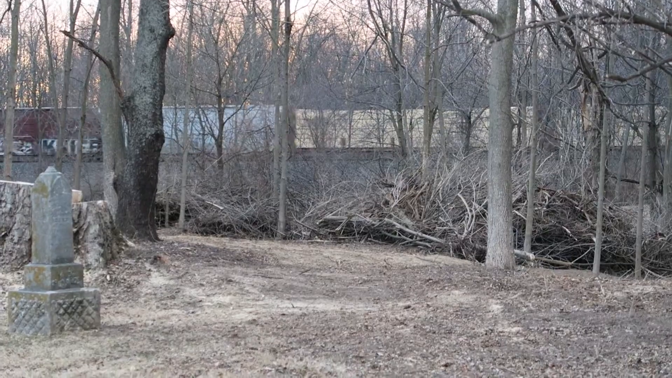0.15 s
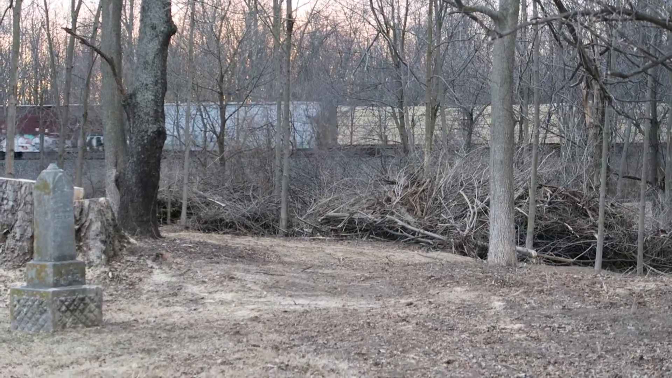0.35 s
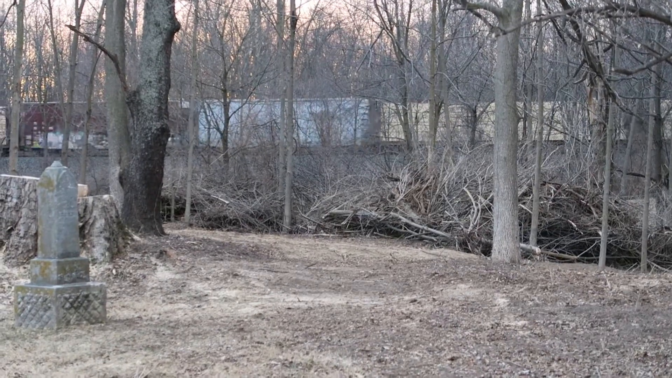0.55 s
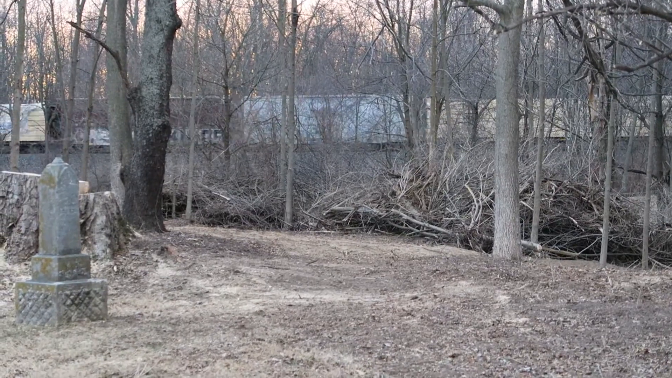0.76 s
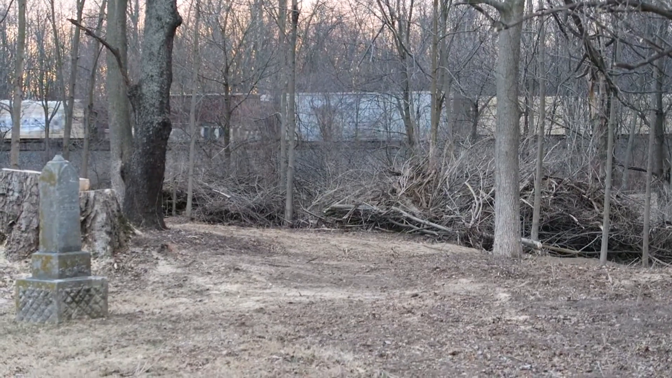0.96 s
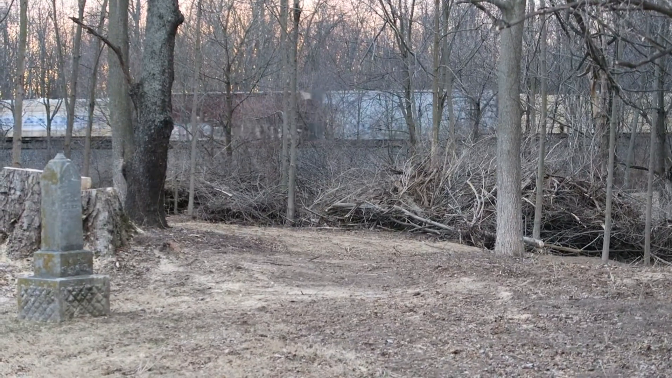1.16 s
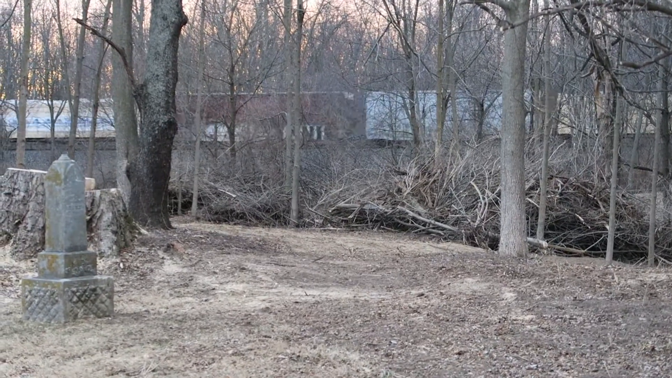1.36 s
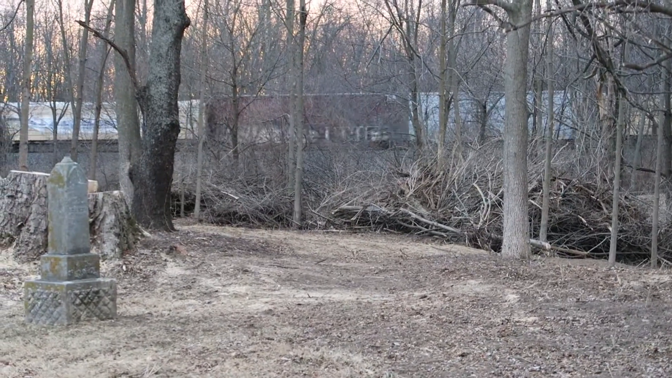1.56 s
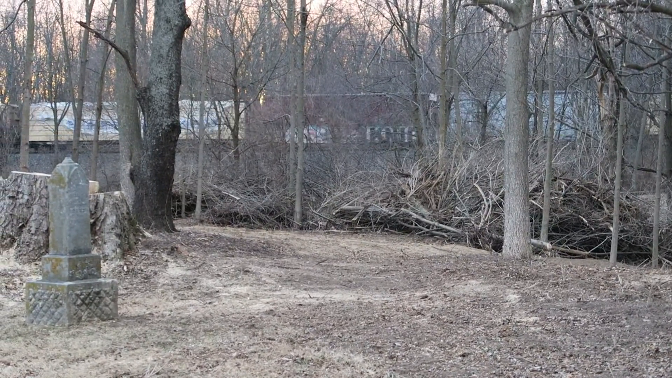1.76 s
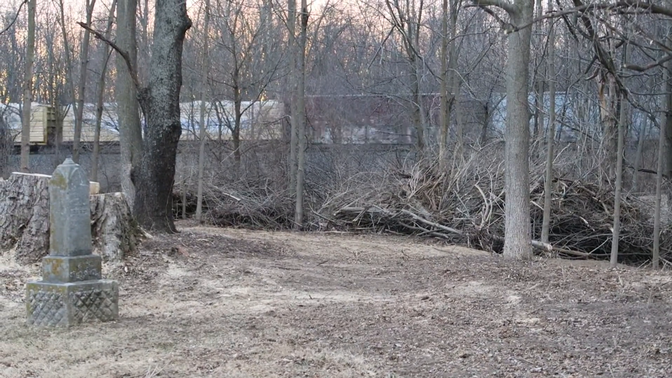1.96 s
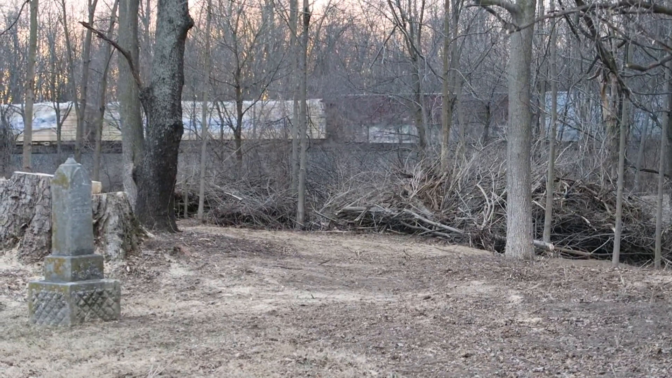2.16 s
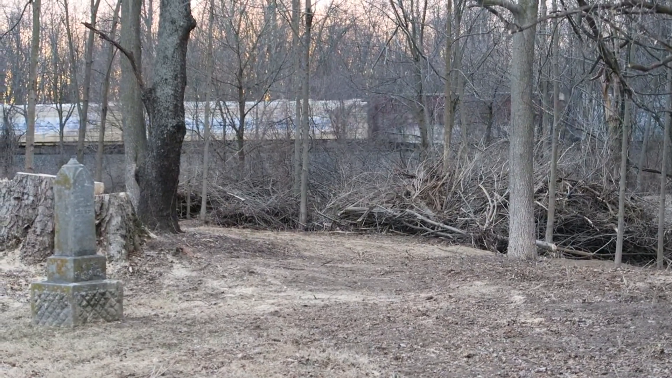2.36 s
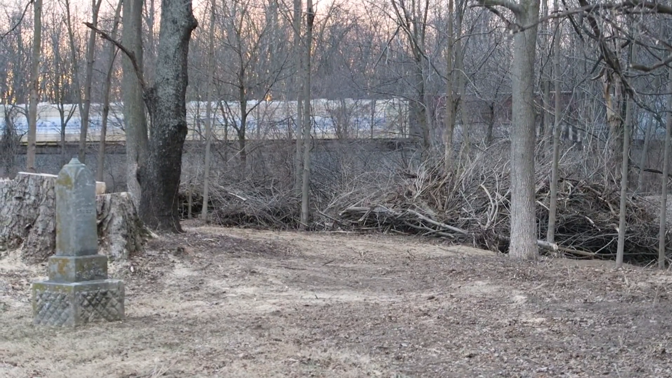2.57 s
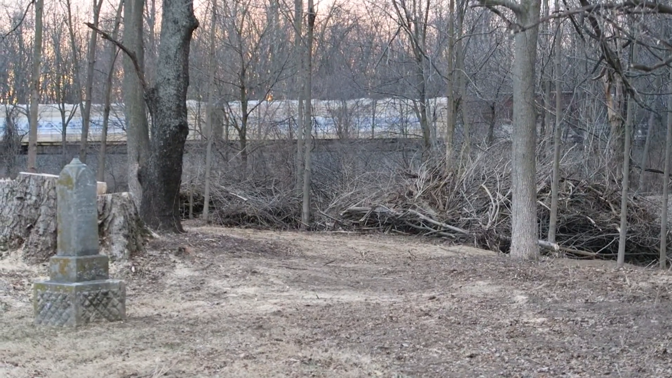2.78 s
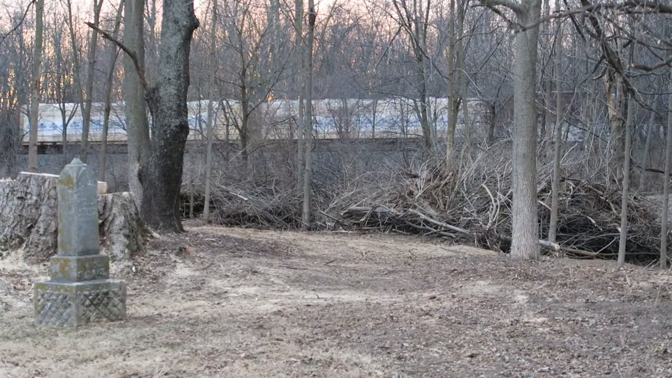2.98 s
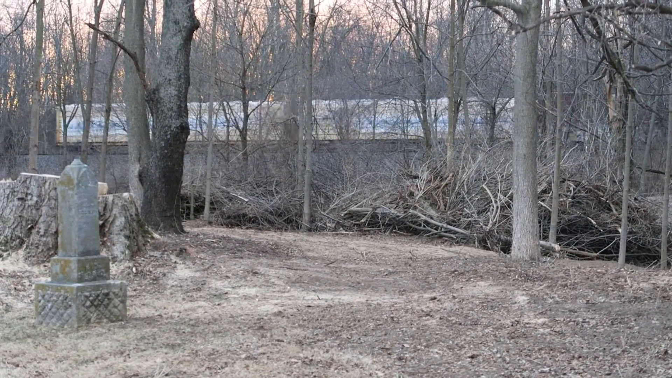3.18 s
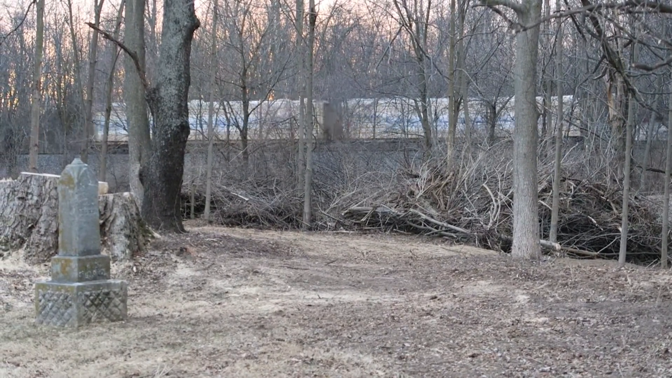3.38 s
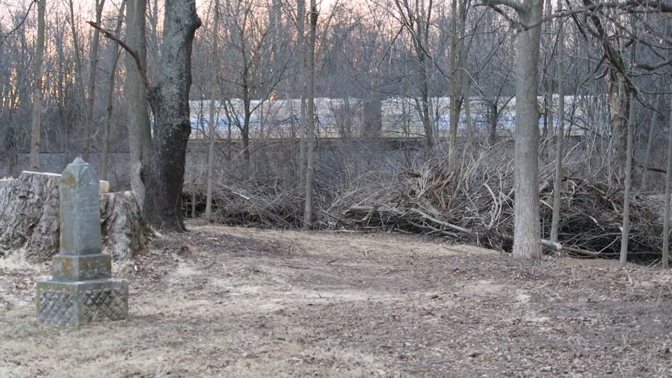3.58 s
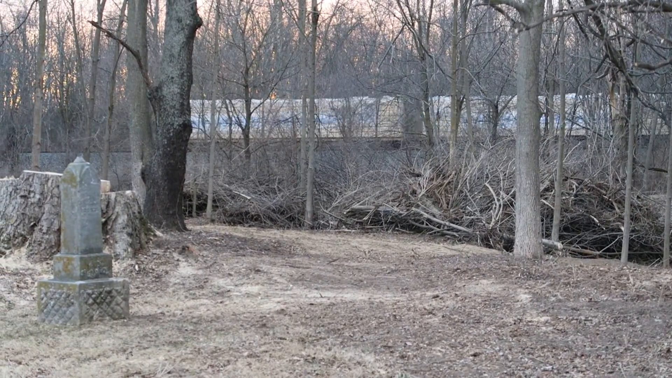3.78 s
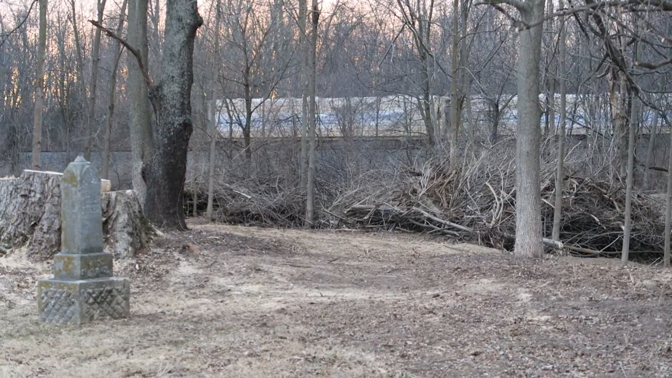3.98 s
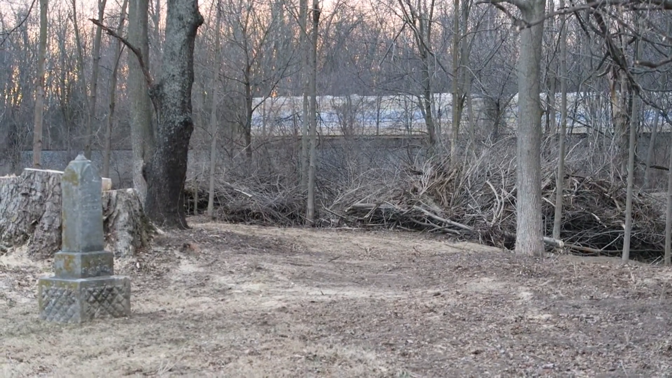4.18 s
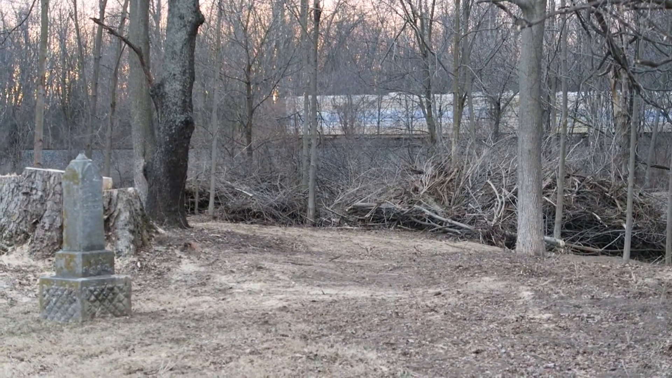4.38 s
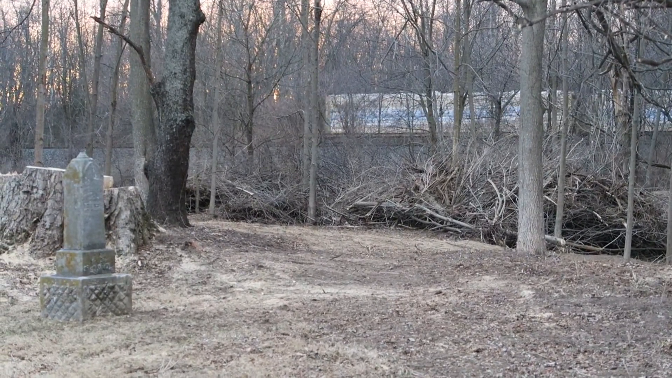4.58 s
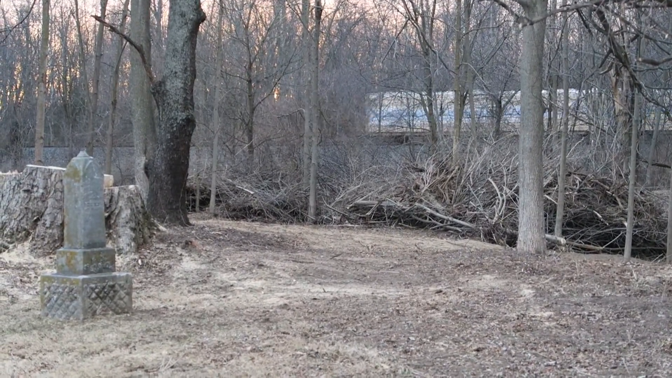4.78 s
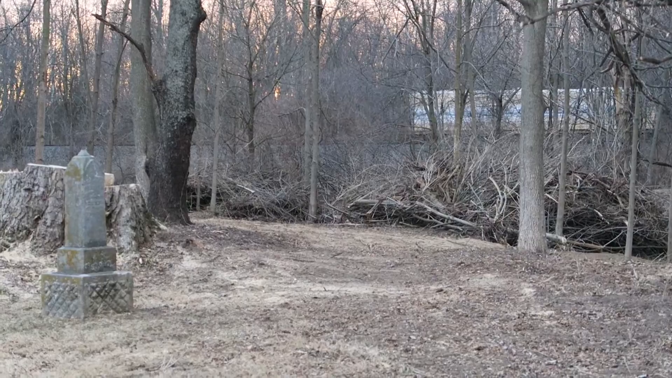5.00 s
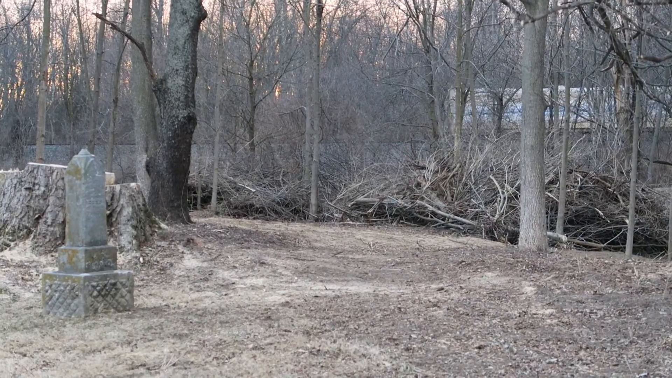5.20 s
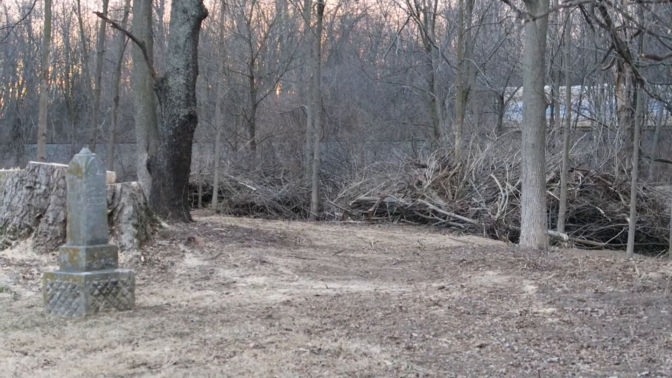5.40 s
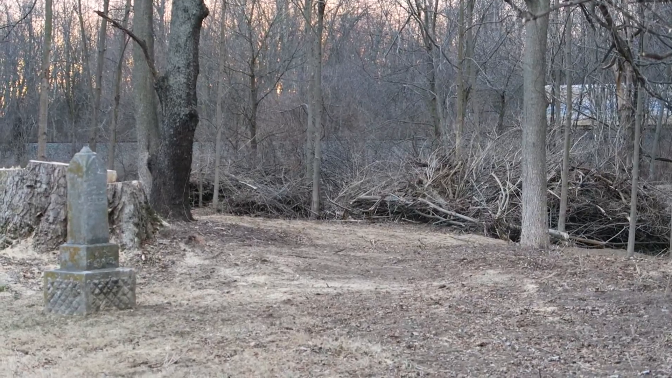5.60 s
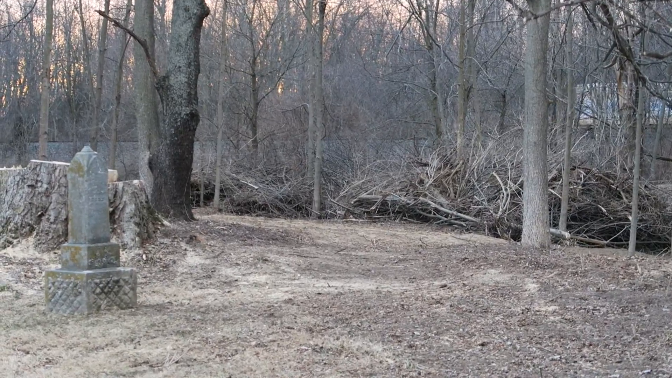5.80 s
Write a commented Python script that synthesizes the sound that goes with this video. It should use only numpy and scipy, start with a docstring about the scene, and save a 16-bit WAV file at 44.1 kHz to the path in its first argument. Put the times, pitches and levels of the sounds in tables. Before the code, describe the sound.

A freight train is already rolling past behind bare trees. A low throbbing diesel drone and heavy ground rumble dominate, with a muffled wheel roar and softer hiss above. Irregular dull thumps, blurred rattles and a few coupler clanks pass by. The roar surges with each wagon, then sinks in the last second. Outdoor, mid-distance microphone, narrow stereo, light woodland echo.

```python
"""Freight train behind bare trees

A long freight train rolls by behind a belt of bare trees and fades as its last wagons pass.
Sine waves make the diesel's throbbing drone, the hums, the thumps and the ringing or singing wheels.
Shaped noise makes the rumble, the roar and hiss of wheels on rails, and the flange scrapes.
Single clicks become rattles, clanks and ticks; the trunks blur the rattle."""
import sys
import numpy as np
from scipy import signal
from scipy.fft import rfft, irfft, next_fast_len
from scipy.io import wavfile
from scipy.ndimage import uniform_filter1d, map_coordinates

SR = 44100
rng = np.random.default_rng(int(sys.argv[2]) if len(sys.argv) > 2 else 0)


def put_to_file(sound):
    """Save the sound as 16-bit audio at rate SR, in the file named by the first command-line argument."""
    columns = np.atleast_2d(sound).T  # one column per channel
    safe = np.clip(columns, -1, 1)
    whole_steps = np.round(safe * 32767)
    wavfile.write(sys.argv[1], SR, whole_steps.astype(np.int16))


N = 257984  # length in samples

# how fast the diesel fires: t/s, f/Hz
FIRING_PITCH = [(0, 73.6), (2.8, 73.42), (5.85, 73.15)]
# loudness of the diesel's drone: t/s, level/dB
DRONE_LEVEL = [(0, -11.5), (.2, -20), (.5, -12.5), (1, -21), (1.9, -15), (2.3, -20), (2.9, -16.5),
               (3.95, -19.5), (4.3, -13.5), (4.66, -23.5), (5.15, -18), (5.6, -29.5), (5.85, -24.5)]
# tones in the drone: multiple of the crankshaft rate, relative level/dB
ENGINE_ORDERS = [(8, 5), (11, -21.5), (16, -18.5)]
# the drone throbs once a crankshaft turn: swing either way and its random unevenness, in dB
THROB_DB, UNEVEN_DB = 3.5, 0.56
# low hums that swell and fade around the drone: t/s, length/s, f/Hz, level/dB before wavering
HUMS = [(1.704, 1.5, 215.1, -38), (1.896, 0.48, 66.55, -25), (2.544, 0.44, 68.3, -22.5),
        (2.795, 0.41, 59.9, -21), (3.247, 1.9, 86, -28), (3.249, 2.4, 99.3, -27.5), (4.35, .4, 62.77, -21),
        (4.599, 1.5, 155.2, -37)]

# tone colour of the shaking wagon bodies and ground: f/Hz, relative level/dB per Hz
RUMBLE_COLOUR = [(12, -48.5), (22, -34), (32, -19), (40, -8.5), (48, -1), (54, -2.5), (61, -6.5),
                 (68, -2.5), (78, -1.5), (90, -1), (105, -2), (140, -8.5), (178, -17), (212, -15.5),
                 (250, -26), (450, -38), (900, -100)]
# heavy and light wagons shake the ground: t/s, level/dB before lurching
SHAKE_LEVEL = [(0, -21.5), (.25, -20.7), (.58, -18.2), (.78, -20.5), (1.15, -18.5), (2.2, -20.5),
               (2.7, -18.8), (3.08, -20), (3.37, -18), (3.8, -19.8), (4.4, -18.9), (5, -21.6),
               (5.85, -24.2)]
LURCH_DB, LURCH_RATE = 1.07, 10  # random lurches of the rumble: depth in dB, knots per second
# wheels thump over dips in the track: t/s, peak level/dB
THUMPS = [(.114, -12), (.554, -12), (.636, -11), (1.402, -13), (1.827, -14), (2.072, -11), (2.518, -15),
          (2.601, -15.5), (2.944, -10.5), (3.396, -13), (3.734, -14), (4.469, -15), (5.052, -14.5)]
# a thump: pitch in Hz, its scatter either way (share), length in s
THUMP_HZ, THUMP_SPREAD, THUMP_S = 76.4, .1, .035

# the wagons surge as each pair of bogies passes:
# t/s, roar level/dB, hiss level/dB (both before small trims and wavering)
WAGON_LEVELS = [(0, -25.5, -35.5), (.16, -25.5, -39), (.46, -23, -35.5), (.59, -24, -34.3),
                (.66, -25, -39.5), (.78, -24, -38.5), (.88, -24.5, -37.5), (1.03, -23.5, -34.5),
                (1.17, -24, -37.5), (1.36, -23, -35), (1.46, -24, -37), (1.83, -23, -35.5),
                (2.05, -24.5, -38), (2.33, -25.7, -35.5), (2.48, -24, -36), (2.68, -23.5, -35),
                (2.86, -21.5, -34), (2.92, -24, -34.5), (2.98, -25, -39), (3.34, -23.5, -35),
                (3.46, -26.5, -38), (3.66, -24.5, -36), (3.8, -25, -39.5), (4.08, -24, -35.5),
                (4.3, -23.5, -37.5), (4.44, -24.5, -36.5), (4.53, -26.5, -38), (4.67, -26, -38),
                (4.84, -24.5, -36), (4.96, -25, -38), (5.08, -27.5, -40.5), (5.4, -28.5, -40.5),
                (5.85, -31, -43.5)]
# wheels on rails heard through the trees: f/Hz, relative level/dB per Hz
ROAR_COLOUR = [(100, -31), (200, -5), (290, -2.5), (480, -2.5), (580, -1), (680, -1), (800, -3.5),
               (920, -6.5), (1100, -8.5), (1300, -16.5), (1800, -21), (3000, -49), (6000, -81)]
# wheel hiss heard through the trees: f/Hz, relative level/dB per Hz
HISS_COLOUR = [(600, -29.5), (1300, 0), (1600, 4.5), (2150, -1.5), (2600, -2), (3050, -9), (3700, -13),
               (4400, -18), (5200, -25), (6300, -31.5), (8000, -40), (10500, -45.5), (12000, -51),
               (14000, -72)]
# wheel resonances: f/Hz, width setting/Hz, relative level/dB
WHEEL_MODES = [(1625, 130, -9), (1869, 120, 2), (2434, 186, -0.5), (2622, 40, -3.5), (3294, 120, -6.5),
               (4020, 170, -15.5)]
# wheels differ: resonance shift either way (share), random changes in knots per second
WHEEL_SPREAD, WHEEL_RATE = .015, 5
# resonances of loose running gear: f/Hz, width setting/Hz, relative level/dB
GEAR_MODES = [(200, 25, -4.5), (433, 71, -4.5), (602, 125, 3), (1050, 240, -5.5), (1820, 480, -17),
              (2580, 340, -15.5)]
# couplers clank: t/s, strike strength/dB before the gear shapes it
CLANKS = [(.532, 17), (2.215, 14), (2.925, 16), (4.233, 16), (5.135, 13), (5.767, 10)]

# single wheels ring out of the roar: t/s, length/s, f/Hz, level/dB
RINGS = [(0.53, 0.056, 688, -29.5), (1.06, 0.082, 702, -29.5), (1.366, 0.06, 660, -28),
         (1.865, 0.06, 661, -31), (2.54, 0.037, 2470, -41), (2.58, 0.08, 2610, -42.5),
         (2.77, 0.06, 2640, -40.5), (2.705, .02, 1880, -34), (2.902, 0.08, 726, -29.5)]
FLUTTER_DB = 4  # random swing of a ringing wheel as it catches and lets go, in dB
WANDER_HZ, WANDER_RATE = 20.5, 84  # its pitch wanders: depth in Hz, knots per second

# flange scrapes: t/s, length/s, level/dB before the grit
SCRAPES = [(.63, .1, -55), (.79, .14, -57), (2.855, .15, -45.3), (2.92, .07, -50.5), (4.33, .18, -54),
           (5.69, .07, -52), (5.8, .1, -53)]
# tone colour of a scrape: f/Hz, relative level/dB per Hz
SCRAPE_COLOUR = [(1200, -22), (2600, 4.5), (4200, -3.5), (6000, -16.5), (9500, -37), (13000, -58.5)]
# a singing flange peaks and lingers faintly: t/s, length/s, level/dB
SQUEAL = [(.395, .06, -70), (.43, .3, -83)]
# small dry ticks: t/s, strength/dB before colouring
TICKS = [(.62, -24), (1.374, -23), (2.84, -22), (4.6155, -10.5), (4.619, -18)]
# tone colour of a tick: f/Hz, gain/dB
TICK_COLOUR = [(300, 0), (1200, 6), (2600, 2), (4100, 1), (5200, -11), (6400, -15), (7500, -34),
               (12000, -54)]

# stereo width of the noises and the rattle: f/Hz, side minus mid level/dB
STEREO_WIDTH = [(60, -27.5), (87, -32.5), (130, -22.5), (180, -22), (260, -18), (380, -10.5), (560, -14.5),
                (810, -13.5), (1170, -14), (1690, -12.5), (2460, -19), (3560, -10)]
# how long the wood echoes: f/Hz, time to fall by 60 dB/s
TREE_DECAY = [(100, 0.34), (700, 0.93), (3000, 0.57), (10000, 0.12)]
# air and brush swallow treble from the wheel modes and loose gear: f/Hz, gain/dB
AIR_LOSS = [(2500, -0.5), (4500, -4.5), (7000, -25), (12000, -58.5)]
TOP_HZ = 13500  # nothing is kept from this pitch up


def amp(db):
    """Turn decibels into a multiplying gain."""
    return 10 ** (np.asarray(db) / 20)


def unit(x):
    """Scale a sound to an rms (average strength) of 1."""
    return x / np.sqrt(np.mean(x ** 2) + 1e-20)


def along(points, hz):
    """Join (f/Hz, value) points with straight lines on a log pitch axis."""
    f, value = np.transpose(points)
    return np.interp(np.log(hz + 1), np.log(f + 1), value)


def curves(rows):
    """Give one value per sample for each column after the time."""
    s, *columns = np.transpose(rows)
    return [np.interp(np.arange(N) / SR, s, column) for column in columns]


def wobble(rate):
    """Draw a smooth random curve through rate random knots a second."""
    knots = rng.standard_normal(int(N * rate / SR) + 4)
    return map_coordinates(knots, [np.arange(N) * rate / SR])


def swell(s, length):
    """Make a bell-shaped rise and fall around time s."""
    return np.exp(-(2 * (np.arange(N) / SR - s) / length) ** 2)


def blows(rows):
    """Place a one-sample click for each (t/s, strength/dB) row."""
    s, db = np.transpose(rows)
    return np.bincount(np.round(s * SR).astype(int), amp(db), N)[:N]


def filtered(x, response):
    """Multiply the spectrum of x by a response, with spare room at the end for its tail."""
    m = next_fast_len(N + SR // 2)
    spectrum = rfft(x, m) * response(np.fft.rfftfreq(m, 1 / SR))
    return irfft(spectrum, m)[..., :N]


def colour(points):
    """Turn a (f/Hz, dB) table into a filter response."""
    return lambda hz: amp(along(points, hz))


def body(modes):
    """Resonate like distant metal: each mode applies twice for steep sides, then air dulls it."""
    def response(hz):
        total = 0
        for centre, width, db in modes:
            damping = 1j * hz * 2 * width
            peak = damping / (centre * centre - hz * hz + damping)
            total = total + amp(db) * peak ** 2
        return total * colour(AIR_LOSS)(hz)
    return response


def patchy(depth_db):
    """Make two noises whose strength drifts in shared patches of pitch and time."""
    z = signal.stft(rng.standard_normal((2, N)), nperseg=1024)[2]
    field = rng.standard_normal(z.shape[1:])
    field = uniform_filter1d(field, size=6, axis=0)  # smooth over pitch
    field = uniform_filter1d(field, size=9, axis=1)  # smooth over time
    return signal.istft(z * amp(depth_db * unit(field)), nperseg=1024)[1][:, :N]


def spread(pair, response):
    """Colour two signals as mid and side and blend them into a narrow stereo image of rms 1."""
    def mid_side(hz):
        return response(hz) * np.array([np.ones_like(hz), amp(along(STEREO_WIDTH, hz))])
    mid, side = filtered(pair, mid_side)
    return unit(np.array([mid + side, mid - side]))


def trees(x, wet_db):
    """Add scatter from the trunks, a fading noise tail, and return mid and side."""
    hz, t, z = signal.stft(rng.standard_normal((2, SR // 2)), SR, nperseg=256)
    fade = amp(-60 * t / along(TREE_DECAY, hz)[:, None])
    tail = signal.istft(z * fade, SR, nperseg=256)[1]
    tail = tail / np.linalg.norm(tail[0])
    mid, side = signal.fftconvolve(x[None], tail, axes=1)[:, :N]
    return np.array([unit(x + amp(wet_db) * mid), unit(side)])


def diesel(count=8):
    """Count firings a turn make the drone, two weaker higher orders colour it, and it throbs every turn."""
    (pitch,), (db,) = curves(FIRING_PITCH), curves(DRONE_LEVEL)
    turns = np.cumsum(pitch / count) / SR  # crankshaft turns so far
    orders = 0
    for order, level in ENGINE_ORDERS:
        strength = amp(level + 0.33 * wobble(0.86))
        orders = orders + strength * np.sin(2 * np.pi * (round(order) * turns + rng.random()))
    throb = amp(THROB_DB * np.cos(2 * np.pi * turns) + UNEVEN_DB * wobble(16))
    return amp(db) * unit(throb * orders)


def rumble():
    """Uneven track shakes the wagon bodies and the ground: low noise with random lurches."""
    db, = curves(SHAKE_LEVEL)
    noise = spread(rng.standard_normal((2, N)), colour(RUMBLE_COLOUR))
    return amp(db + LURCH_DB * wobble(LURCH_RATE)) * noise


def wheel_ring(shift):
    """Rough treads excite wheel resonances; a positive shift lowers them, as for larger wheels."""
    return spread(patchy(depth_db=1.5), lambda hz: body(WHEEL_MODES)(hz * (1 + shift)))


def rolling(roar_db, hiss_db):
    """Rough treads drive the rails broadly and make large and small wheels ring by turns."""
    roar = amp(roar_db - 0.16 + 0.33 * wobble(13)) * spread(patchy(depth_db=1.4), colour(ROAR_COLOUR))
    hiss = amp(hiss_db - 1.5) * spread(patchy(depth_db=1), colour(HISS_COLOUR))
    large, small = wheel_ring(WHEEL_SPREAD), wheel_ring(-WHEEL_SPREAD)
    turn = wobble(WHEEL_RATE)
    mix = np.cos(turn + np.pi / 4) * large + np.sin(turn + np.pi / 4) * small
    ring = amp(hiss_db - 5.0) * mix
    flicker = amp(0.7 * wobble(90))  # the treble flickers
    return roar + (hiss + ring) * flicker


def rattle(db, count=220):
    """Couplers and bogies knock at random, blurred by the trees."""
    when, size = rng.random((count, 2)).T
    knocks = np.bincount((when * N).astype(int), size ** 2, N)  # squaring makes most knocks small
    return amp(db - 8.5) * spread(trees(knocks, wet_db=8.5), body(GEAR_MODES))


def thumps():
    """A wheel drops into a dip in the track and its wagon booms for a few cycles."""
    t = np.arange(N) / SR
    total = 0
    for (s, db), (detune, phase) in zip(THUMPS, rng.random((len(THUMPS), 2))):
        hz = THUMP_HZ * (1 + THUMP_SPREAD * (2 * detune - 1))
        boom = np.sin(2 * np.pi * (hz * t + phase))
        total = total + amp(db) * swell(s, THUMP_S) * boom
    return total


def flanges(squeal_hz=7754):
    """Flanges rub the rail: gritty scrapes of noise, and one thin wavering note."""
    rub = sum(amp(db) * swell(s, length) for s, length, db in SCRAPES)
    grit = amp(1.2 * wobble(90))
    scrape = rub * grit * spread(rng.standard_normal((2, N)), colour(SCRAPE_COLOUR))
    pitch = squeal_hz + 22 * wobble(130)
    note = unit(np.sin(2 * np.pi * np.cumsum(pitch) / SR))
    singing = sum(amp(db) * swell(s, length) for s, length, db in SQUEAL)
    return scrape + singing * note


def ringing_wheels():
    """Now and then a passing wheel rings briefly in one unsteady mode."""
    total = 0
    for s, length, hz, db in RINGS:
        flutter = amp(FLUTTER_DB * wobble(WANDER_RATE))
        pitch = hz + WANDER_HZ * wobble(WANDER_RATE)
        mode = unit(flutter * np.sin(2 * np.pi * np.cumsum(pitch) / SR))
        total = total + amp(db) * swell(s, length) * mode
    return total


def clanks():
    """Slack couplers strike hard and set the running gear ringing."""
    return filtered(blows(CLANKS), body(GEAR_MODES))


def ticks():
    """Clicks filtered into short dry snaps."""
    return filtered(blows(TICKS), colour(TICK_COLOUR))


def hum():
    """Low tones come and go, beating against the drone."""
    t = np.arange(N) / SR
    total = 0
    for s, length, hz, db in HUMS:
        tone = unit(np.sin(2 * np.pi * (hz * t + rng.random())))
        total = total + amp(db + 1.6 * wobble(2.6)) * swell(s, length) * tone
    return total


def scene():
    """The rattle follows the roar; the bass leans slightly left, the wheel noise slightly right."""
    roar_db, hiss_db = curves(WAGON_LEVELS)
    low = diesel() + rumble() + thumps() + hum()
    bass = filtered(low, lambda hz: 1 / (1 + (hz / 600) ** 4))  # takes the treble off
    wheels = rolling(roar_db, hiss_db) + rattle(roar_db)
    wheels = wheels + flanges() + ringing_wheels() + clanks() + ticks()
    return bass * amp([[.12], [-.12]]) + wheels * amp([[-.27], [.27]])  # left and right, in dB


def record(dry):
    """Keep only what lies below the top pitch."""
    return filtered(dry, lambda hz: hz < TOP_HZ)


dry = scene()
out = record(dry)
put_to_file(out)
```